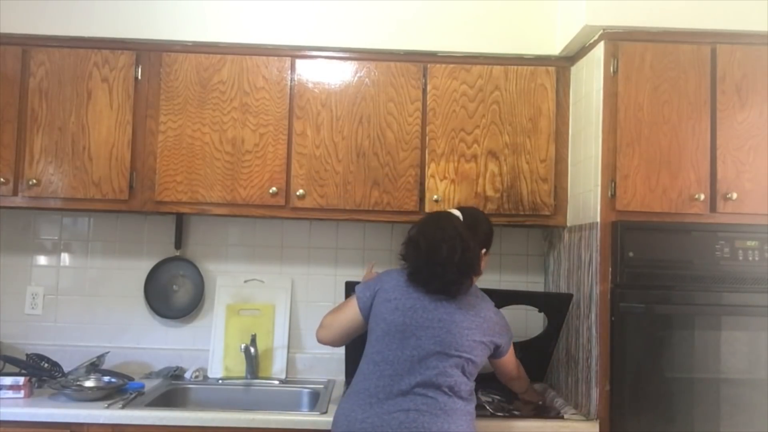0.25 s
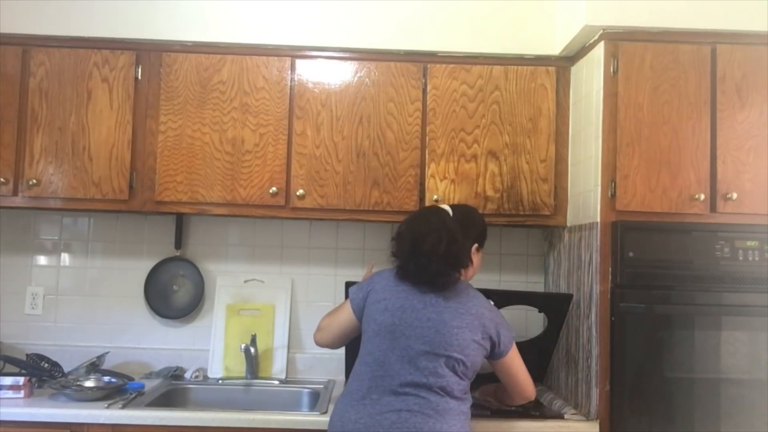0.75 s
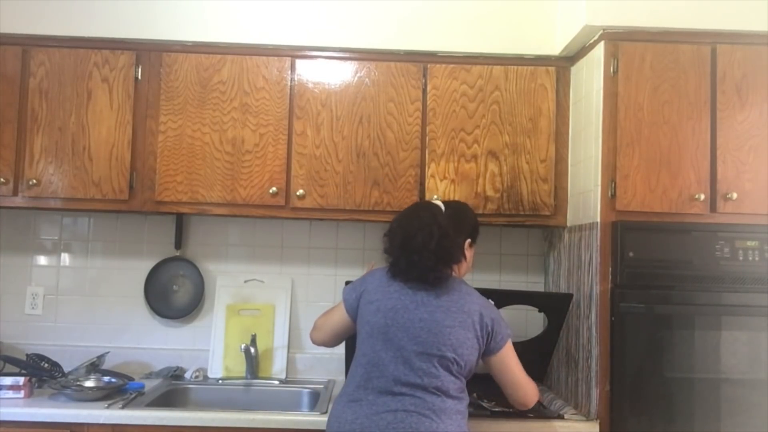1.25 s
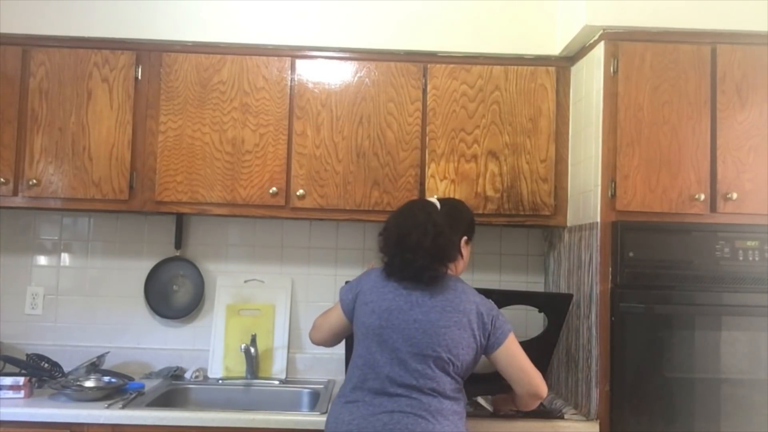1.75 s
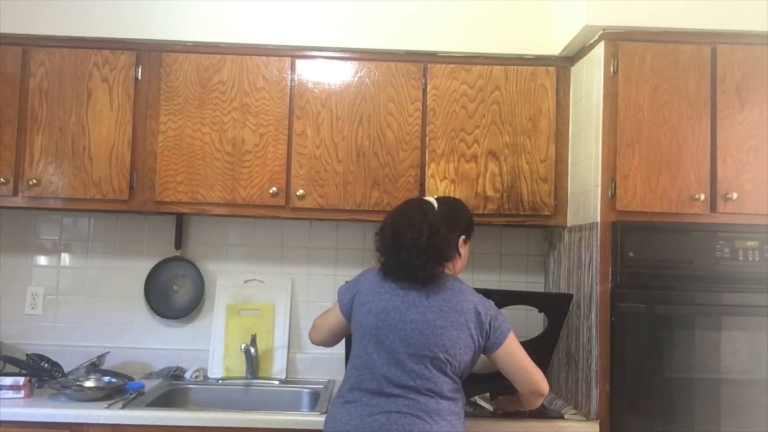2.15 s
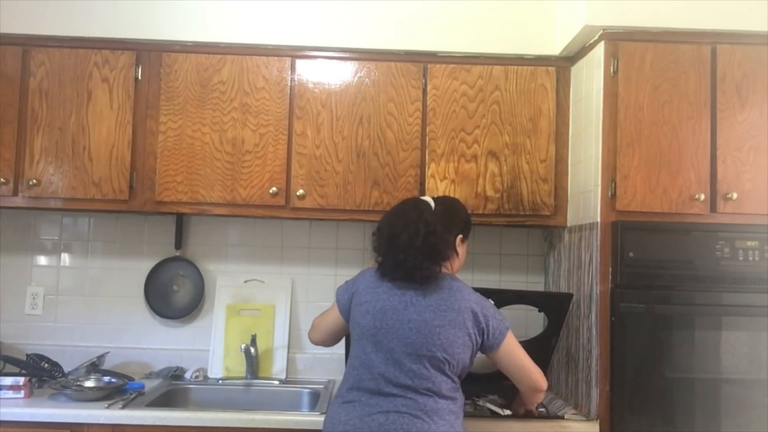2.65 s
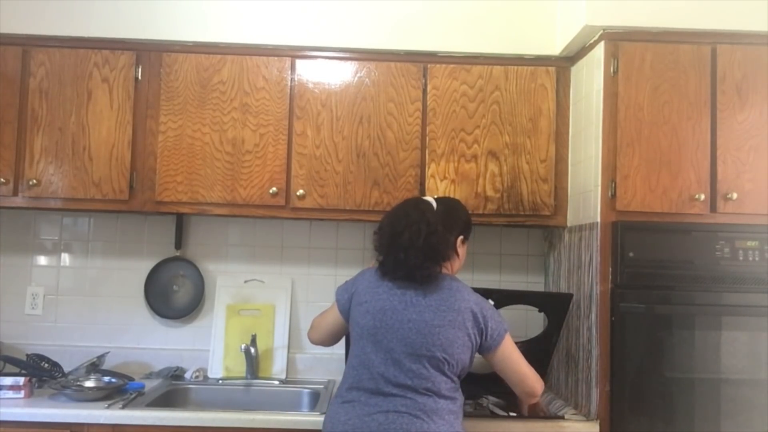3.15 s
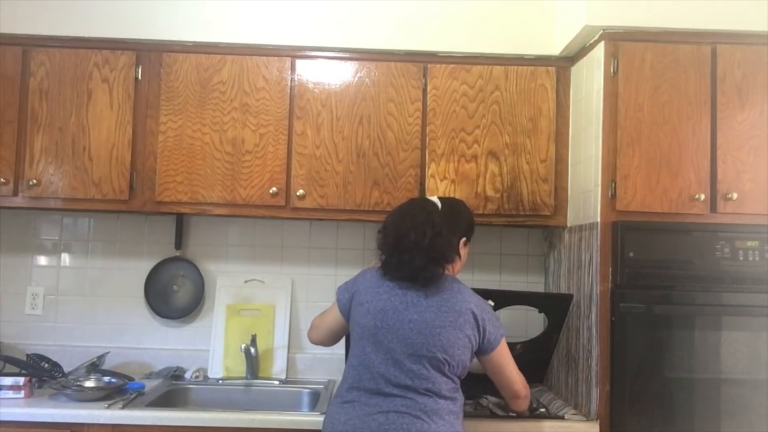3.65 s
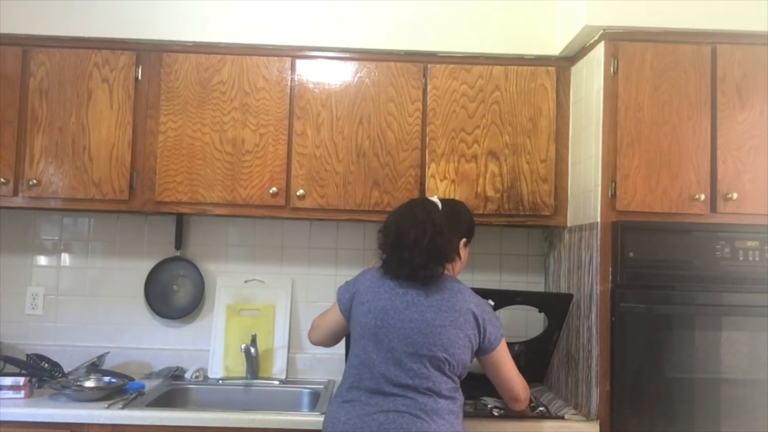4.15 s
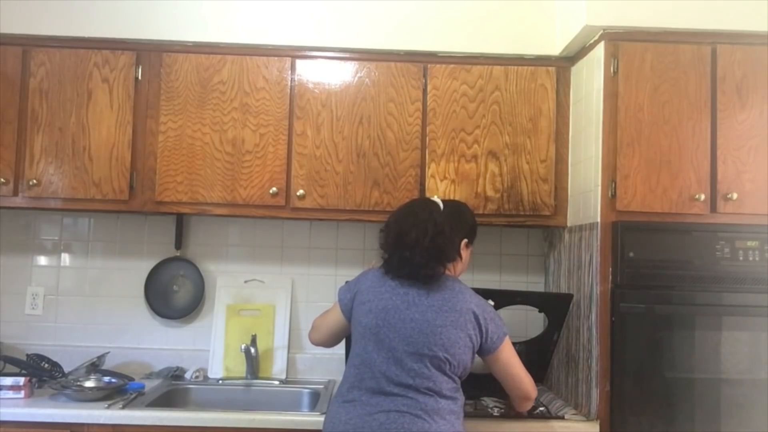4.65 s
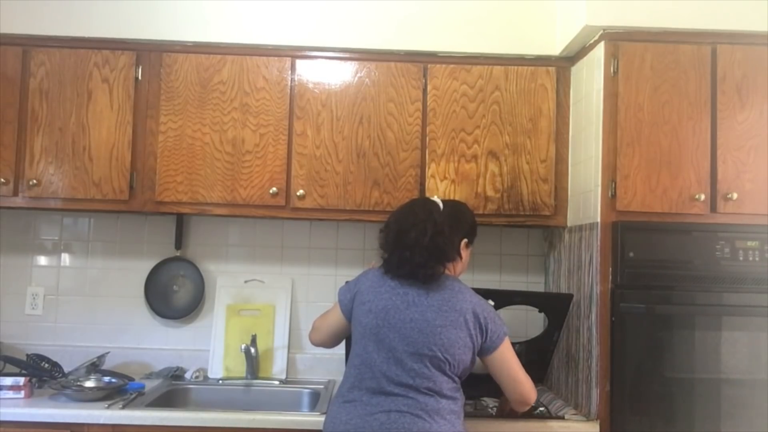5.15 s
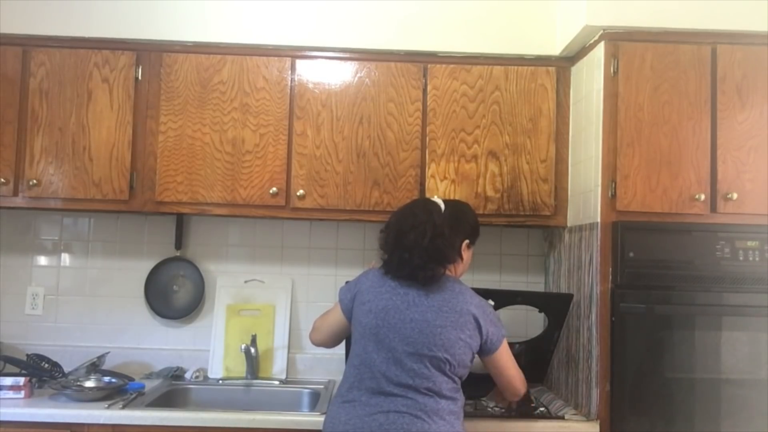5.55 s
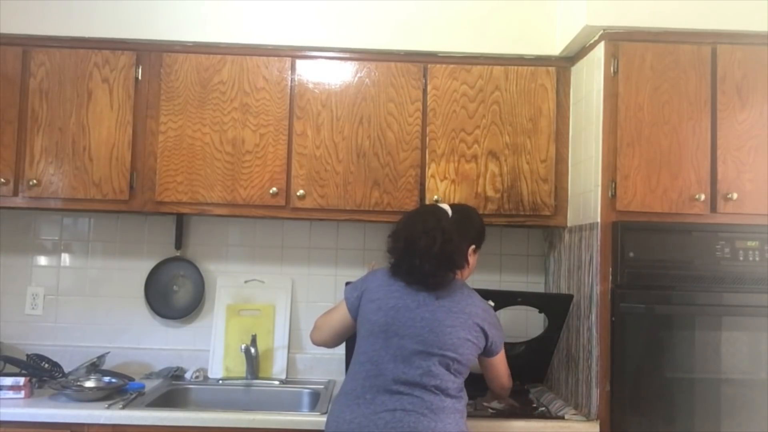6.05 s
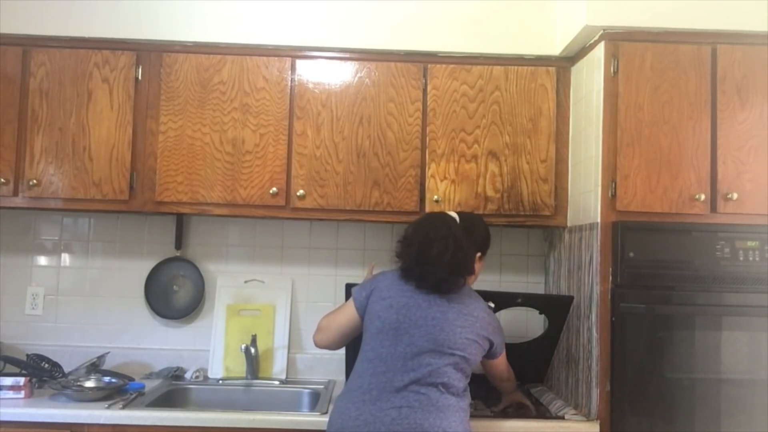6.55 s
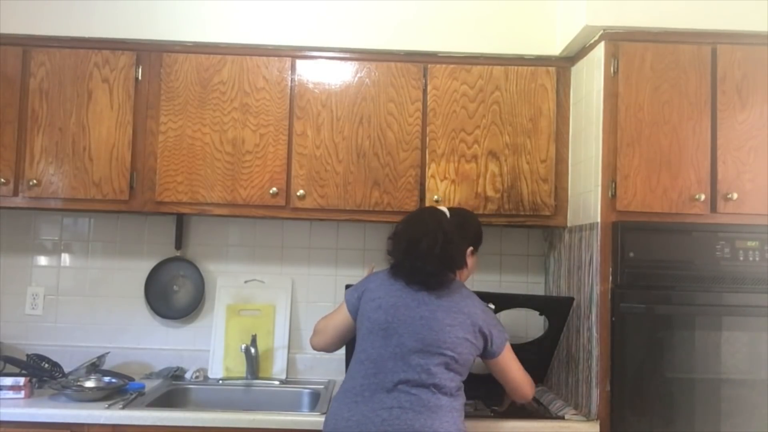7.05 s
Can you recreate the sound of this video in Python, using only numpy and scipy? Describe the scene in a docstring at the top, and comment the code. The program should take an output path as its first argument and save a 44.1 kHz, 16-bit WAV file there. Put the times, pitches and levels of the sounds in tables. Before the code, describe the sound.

Aluminium foil crinkles and snaps in irregular bursts as a hand presses it into a stove, with a few dull metal thuds.

```python
"""Aluminium foil is pressed and smoothed into an open stove, heard in mono across a kitchen.
It opens on light crinkles over a faint hiss: creases buckle in swarms of tiny clicks, single folds snap
and ring, and the room smears them. From 2.5 s the presses come loud and close together, then ease off
near 4.8 s. Between 5.2 and 6.5 s the hand lands its heaviest thuds on the stove's sheet metal, under
more crunches. A few soft presses tail off just after 7 s."""
import sys
import numpy as np
from scipy import signal
from scipy.fft import rfft, irfft
from scipy.io import wavfile
from scipy.ndimage import uniform_filter1d

SR = 44100
rng = np.random.default_rng(int(sys.argv[2]) if len(sys.argv) > 2 else 0)


def log_audio(samples):
    """Write samples as a 16-bit WAV file to the path given in sys.argv[1]."""
    # one column per channel
    frames = np.atleast_2d(samples).T
    # limit to full scale, then quantise
    limited = np.clip(frames, -1, 1)
    pcm = np.round(limited * 32767).astype(np.int16)
    wavfile.write(sys.argv[1], SR, pcm)


N = 321818

# each press of the hand on the foil:
# (start [s], attack [s], length [s], level [dB], fade [dB/s], brightness [dB], low body [dB])
HAND_PRESSES = [(0, 0.00073, .03, -42.5, 146, 0.5, -19), (0.027, 0.015, .06, -43.5, 249, 2, -19),
                (0.081, 0.062, 0.14, -46.5, 108, 2, -26), (0.208, 0.036, 0.35, -56.5, 26.5, -3, -21),
                (.56, 0.025, .08, -60.5, 5, -6, -30), (0.612, 0.047, 0.14, -52, 190, -5, -26),
                (0.685, 0.088, 0.22, -57, 2, -5, -20.5), (0.84, 0.049, 0.12, -48.5, 17, 3, -16),
                (0.922, .016, 0.036, -43.5, 403, -6, -19), (0.948, 0.0088, .1, -57, 70, -1.5, -11),
                (1.04, 0.026, 0.23, -60, 53, -3, -20), (1.497, .06, 0.12, -58, -3, 2, -19),
                (1.719, .1, .36, -39, 51.5, -1, -14.5), (2.08, 0.016, 0.075, -41, 312, -1, -34),
                (2.152, 0.028, 0.091, -46.5, 400, -28, -19), (2.248, 0.049, .06, -52, 340, -3.5, -10),
                (2.304, 0.047, .06, -48.5, 115, -2, -19), (2.369, 0.019, .11, -51, 154, -4, -17),
                (2.475, 0.1, 0.26, -40, 182, 1, -30), (2.589, 0.17, 0.25, -32.5, 80, -2.5, -19.5),
                (2.832, 0.029, 0.1, -35.5, 121, 0, -17.5), (2.91, .054, 0.2, -38.5, 201, -6, -25),
                (3.046, 0.056, 0.15, -41, 177, -4, -25), (3.162, 0.021, .05, -53, 103, -1.5, -19),
                (3.243, 0.015, 0.1, -43, 175, -6, -21), (3.355, 0.011, 0.078, -53.5, 382, -9, -12),
                (3.4, .05, .2, -73.5, 2, -2.5, -16), (3.672, 0.07, 0.064, -34.5, 7, -2, -18.5),
                (3.737, 0.03, 0.19, -28.5, 97, -2, -15.5), (3.94, 0.028, 0.093, -35.5, 8, -5, -24),
                (3.959, 0.099, 0.2, -32, 163, 0, -18), (4.157, 0.041, 0.17, -33.5, 305, -5, -16),
                (4.412, 0.027, 0.059, -34, 308, -17, -14.5), (4.428, 0.095, 0.24, -28, 139, -2.5, -20.5),
                (4.554, .08, 0.23, -27.5, 393, -2.5, -15.5), (4.702, 0.072, 0.16, -67, 5, -1, -5),
                (4.85, 0.023, .085, -56, 135, -13, -17), (4.932, .01, 0.16, -63.5, 28, -10, -12),
                (5.249, 0.041, 0.068, -29.5, 186, -4, -5), (5.323, 0.032, 0.076, -40, 10, -1.5, -15),
                (5.414, 0.014, .1, -31.5, 301, -2.5, -27.5), (5.459, 0.024, .14, -54, 111, 4, -13),
                (5.74, 0.017, .03, -47, 10, -13, -22), (5.754, 0.023, 0.17, -27, 10, 0, -22),
                (5.871, 0.057, .09, -26.5, 277, -16, -10), (5.941, 0.032, .22, -37, 82, -2.5, -14),
                (6.288, 0.024, 0.09, -43.5, 16, 2, -23), (6.377, 0.016, .06, -35, 31, -1.5, -23),
                (6.423, 0.03, 0.11, -31, 186, 3, -13), (6.5, 0.058, .17, -51, 84, 4, -10.5),
                (6.663, 0.035, 0.12, -44.5, 17, 3.5, -14.5), (6.793, 0.043, 0.073, -50, 143, 3.5, -12),
                (6.886, 0.017, 0.043, -51.5, 148, 5.5, -15), (6.946, 0.013, 0.046, -54.5, 150, 2.5, -6),
                (6.991, 0.025, 0.02, -54, 198, -15, 5)]
# tone colour of crinkling foil: (frequency [Hz], relative level per Hz [dB])
FOIL_SPECTRUM = [(120, -72), (200, -45), (267, -13.5), (395, -8), (542, -10), (779, -2), (1560, 4),
                 (2490, -1.5), (3750, 3), (4560, -2.5), (6270, -7.5), (6970, -6.5), (7400, -80),
                 (9620, -49), (16300, -120)]
# single folds that snap: (time [s], level [dB], ring pitch [Hz], ring trim [dB], nominal t60 [s])
FOLD_SNAPS = [(0.012, -42.5, 1724, 4, 0.13), (0.092, -37, 1148, -2, 0.17), (0.193, -35, 3590, 2.5, 0.034),
              (0.571, -50, 2300, 6, 0.048), (0.647, -51, 1307, 11.5, 0.1), (0.851, -45, 1800, 7, 0.17),
              (0.87, -32, 1300, 0.5, 0.12), (0.93, -31, 1270, -2, 0.051), (1.064, -42, 2310, -8, 0.083),
              (1.507, -52, 1100, -3, 0.11), (1.548, -42.5, 1116, -8, 0.056), (1.737, -38.5, 3970, -3, 0.21),
              (2.088, -40.5, 3470, 1, 0.11), (2.092, -59.5, 612, 6.5, 0.47), (2.171, -50, 1578, 9.5, 0.1),
              (2.174, -42, 800, 12.5, 0.047), (2.43, -62.5, 648, 11, 0.3), (2.279, -47.5, 1604, 8.5, 0.12),
              (2.285, -56.5, 473, 3.5, 0.24), (2.338, -50, 1470, 9, 0.071), (2.493, -49, 3200, 8, 0.1),
              (2.527, -30.5, 823, -11.5, 0.2), (2.568, -21.5, 1333, 0.5, 0.048),
              (2.65, -23, 1985, -5, 0.037), (2.749, -25, 2170, 3.5, 0.04), (2.856, -19.5, 1828, -9.5, 0.15),
              (3.088, -27.5, 853, -2.5, 0.087), (3.212, -42, 1340, 5, 0.13),
              (3.255, -37.5, 1490, 10, 0.056), (3.259, -42, 629, 10.5, 0.048),
              (3.363, -39.5, 1515, 1.5, 0.047), (3.463, -59, 1636, 9, 0.063), (3.679, -43, 1870, 8, 0.1),
              (3.702, -21.5, 1795, -1, 0.083), (3.763, -13.5, 1150, 2.5, 0.016),
              (3.912, -30.5, 3450, -6, 0.095), (3.954, -36, 914, -1, 0.088), (4.046, -12, 2860, -6, 0.039),
              (4.159, -34.5, 1479, 2.5, 0.26), (4.404, -42.5, 1550, -2, 0.12),
              (4.433, -23.5, 1866, 2, 0.072), (4.456, -20.5, 1718, -5, 0.064), (4.58, -25, 2280, 6, 0.075),
              (4.782, -49.5, 1780, 9.5, 0.019), (4.82, -47, 1530, -10, 0.076),
              (4.868, -46.5, 3440, 1, 0.063), (5.262, -25, 1694, -1.5, 0.18), (5.274, -16, 1510, -18, 0.13),
              (5.426, -19.5, 3890, 2, 0.019), (5.751, -38, 1826, 9, 0.1), (5.76, -28, 1792, 6.5, 0.34),
              (6.299, -38.5, 988, 0.5, 0.19), (6.322, -27, 1950, -9, 0.16), (6.388, -36, 954, 4, 0.21),
              (6.437, -17.5, 928, -6.5, 0.08), (6.695, -29, 990, -18, 0.091),
              (6.795, -49.5, 470, 8.5, 0.082), (6.823, -37, 1070, -16, 0.12), (6.901, -38, 1830, -13, 0.11),
              (6.964, -34.5, 937, -11, 0.13), (7.005, -44.5, 470, 7.5, 0.079)]
# the hand hits the stove: (time [s], level [dB], hardness as upper-mode gain [dB], time until muted [s])
HAND_THUDS = [(1.735, -74, 12, .1), (2.654, -72.5, 13.5, .04), (2.723, -62.5, 2, .06),
              (2.857, -67, 10, .05), (3.1, -82, -8, .05), (3.714, -73.5, 9, .05), (3.806, -53.5, -13, .12),
              (4.084, -76, 6, .06), (4.185, -73, 14, .05), (4.425, -63, 15, 0.072),
              (4.646, -58, 0.5, 0.087), (5.27, -41, -3.5, .08), (5.33, -46.5, -3.5, 0.093),
              (5.81, -55.5, 1, .05), (5.869, -42.5, -5.5, .07), (5.949, -50.5, -3, .05),
              (6.434, -49, -5, .06), (6.511, -62, 7.5, .06), (6.734, -64, 5, .06), (7.0, -69, 7, 0.046)]
# modes of the stove's sheet metal: (frequency [Hz], level [dB], t60 [s])
STOVE_MODES = [(118.5, 3, 0.2), (190, -4.5, 0.21), (283, -1, 0.48), (420, -6.5, 0.12), (479, 8.5, 0.2),
               (663, -4, 0.2), (850, 0.5, 0.39), (926, -6.5, 0.96)]
# the kitchen's reverb tail: (frequency [Hz], t60 [s])
KITCHEN_DECAY = [(200, 0.16), (1000, 0.18), (3000, 0.28), (7000, 0.17)]
# tone colour of the hiss bed: (frequency [Hz], relative level per Hz [dB])
HISS_SPECTRUM = [(18, -64), (30, -31), (122, -10.5), (177, -15), (268, -8), (586, -6.5), (1090, -0.5),
                 (1860, -4), (2180, -9), (3300, -13), (3540, -15.5), (6300, -17.5), (7400, -29.5),
                 (9620, -65.5), (16300, -120)]
# the hiss creeps up and down: (time [s], level [dB])
HISS_LEVELS = [(0, -79), (1.4, -74.5), (1.7, -76), (3.599, -69.5), (4.37, -69.5), (5.2, -67), (5.699, -70),
               (6.26, -69.5), (7.3, -67.5)]


def foil_crackle(per_s=900, spread_db=1.0, ring_cycles=6.6, patchy_db=3.0, patch_s=0.041, puff_db=-45):
    """Facets of every size buckle at random; a small facet clicks high, a large one low."""
    groups = np.zeros((4, N))  # large, middle, small and tiny facets
    for hz in np.geomspace(230, 7200, num=44):
        strength = gain_of(spread_db * np.minimum(rng.exponential(1, N), 4)) * rng.choice([-1, 1], N)
        buckles = rng.random(N) < per_s * np.sqrt(hz / 2000) / SR  # per_s at 2 kHz, denser above
        patches = gain_of(patchy_db * np.minimum(wander(patch_s), 2))
        cycles = np.arange(round(5 * ring_cycles * SR / hz)) * hz / SR
        click = np.sin(2 * np.pi * cycles) * (1 - np.exp(-cycles)) * np.exp(-cycles / ring_cycles)
        clicks = unit_rms(signal.oaconvolve(strength * buckles * patches, click)[:N])
        share = gain_of(curve_at(FOIL_SPECTRUM, hz)) * np.sqrt(hz)  # a band as wide as its pitch
        groups[np.searchsorted([700, 2800, 4700], hz)] += share * clicks
    envelopes = hand_pressure()
    swarm = sum(envelope * unit_rms(group) for envelope, group in zip(envelopes, groups))
    puff = coloured_noise([(20, -1), (150, 17.0), (300, -24), (600, -60.5)], N)  # the sheet shoves air
    return (swarm + gain_of(puff_db) * envelopes[1] * puff) * flurries()


def hand_pressure(release_db_per_s=403.5):
    """Envelopes for the large, middle, small and tiny facets: each press swells, fades and is let go."""
    power = np.zeros((4, N))
    for start, attack, length, db, fade, bright_db, body_db in HAND_PRESSES:
        t = np.arange(0, length + .2, 1 / SR)
        attack = max(attack, .001)
        fall_db = fade * np.maximum(t - attack, 0) + release_db_per_s * np.maximum(t - length, 0)
        push = np.minimum(t / attack, 1) * gain_of(db - fall_db)
        top_db = -5 + 1.21 * bright_db - 0.076 * fall_db  # tiny facets brighten more and fade faster
        for row, group_db in zip(power, (body_db, 0, bright_db, top_db)):
            place(row, start, (gain_of(group_db) * push) ** 2)
    return np.sqrt(power)


def flurries(per_s=110, spread_db=4.5, t60=0.016):
    """One facet sets off its neighbours: sudden flurries that die away, as a gain of rms 1."""
    kicks = gain_of(spread_db * np.minimum(rng.exponential(1, N), 3)) * (rng.random(N) < per_s / SR)
    decay = 10 ** (-3 / (t60 * SR))
    return unit_rms(1 + 0.19 * signal.lfilter([1], [1, -decay], kicks))


def fold_snaps(rattle_share=0.77, crack_t60=0.011, neighbour_hz=(817, 1109), low_cut_hz=320):
    """A fold gives way: a sharp crack, a noisy rattle, and its facet and a neighbour ringing on."""
    out, t = np.zeros(N), np.arange(8192) / SR
    crack = gain_of(-60 * t / crack_t60) * np.minimum(t / 0.00036, 1)
    attack = np.minimum(t / 0.0015, 1)
    for start, db, hz, ring_db, t60 in FOLD_SNAPS:
        rattle = gain_of(-60 * t / max(rattle_share * t60, .01))
        crack_db = 4 - 64 * t60  # a fold that rings long cracks less
        ring = facet_ring(hz, ring_db, t60, t)
        neighbour = facet_ring(rng.uniform(*neighbour_hz), db=-16.5, t60=t60, t=t)
        burst = 0.2 * coloured_noise(FOIL_SPECTRUM, len(t)) * (rattle + gain_of(crack_db) * crack)
        place(out, start, gain_of(db) * (burst + ring + neighbour) * attack)
    low_cut = signal.butter(2, low_cut_hz, "high", fs=SR, output="sos")  # too small to radiate bass
    return signal.sosfilt(low_cut, out)


def facet_ring(hz, db, t60, t, width_share=0.13, steady=0.6):
    """A dented facet is shaken by the rattle around it, so its tone wobbles; higher ones die sooner."""
    pole = np.exp(-np.pi * width_share * hz / SR)
    shaking = rng.standard_normal(2 * len(t)) + 1j * rng.standard_normal(2 * len(t))
    wobble = signal.lfilter([1], [1, -pole], signal.lfilter([1], [1, -pole], shaking))[len(t):]
    tone = (steady + wobble / abs(wobble).mean()) * np.exp(2j * np.pi * hz * t)
    ring_t60 = max(t60, .01) * (1500 / hz) ** 0.06
    return 0.25 * tone.imag * gain_of(db - 60 * t / ring_t60)


def hand_thuds(attack_s=0.0094, mute_s=0.011):
    """The palm mostly booms the stove's deepest panel, the knuckles all; then the hand mutes them."""
    out, t = np.zeros(N), np.arange(SR // 2) / SR
    attack = (1 - np.exp(-t / attack_s)) ** 2
    for start, db, hard_db, held_s in HAND_THUDS:
        mute = 1 / (1 + np.exp((t - held_s) / mute_s))
        place(out, start, gain_of(db) * stove_panels(t, hard_db, sag=0.161) * attack * mute)
    return out


def stove_panels(t, upper_db, sag=0.0):
    """Sheet metal rings after a blow; a panel under load starts flat and springs back to pitch."""
    bent_t = t - sag * 0.0273 * (1 - np.exp(-t / 0.037))
    return sum(gain_of(db + upper_db * (k > 0) - 60 * t / t60) * np.sin(2 * np.pi * hz * bent_t)
               for k, (hz, db, t60) in enumerate(STOVE_MODES))


def stove_resonance(foil, damping_db_per_s=60):
    """The foil shakes the panels under it for a metallic colour; foil and hands damp them."""
    t = np.arange(SR // 4) / SR
    metal = stove_panels(t, upper_db=2.5) * gain_of(-damping_db_per_s * t)
    return signal.fftconvolve(foil, metal / np.linalg.norm(metal))[:N]


def kitchen_reverb(send, predelay_samples=200, gap_samples=20):
    """The walls return sparse reflections of random sign, each band dying at its own speed."""
    taps = np.zeros(SR // 2)
    slots = np.arange(predelay_samples, len(taps) - gap_samples, gap_samples)
    taps[slots + rng.integers(0, gap_samples, len(slots))] = rng.choice([-1., 1.], len(slots))
    hz, t, bands = signal.stft(taps, SR, nperseg=256)
    decay = gain_of(-60 * t / curve_at(KITCHEN_DECAY, hz)[:, None])
    tail = signal.istft(bands * decay, SR, nperseg=256)[1]
    return signal.fftconvolve(send, tail / np.linalg.norm(tail))[:N]


def hiss_bed(flutter_db=0.3):
    """Air and electronics: soft noise that flutters a little."""
    times, levels = np.transpose(HISS_LEVELS)
    level_db = np.interp(np.arange(N) / SR, times, levels)
    return coloured_noise(HISS_SPECTRUM, N) * gain_of(level_db + flutter_db * wander(0.044))


def gain_of(db):
    """dB to gain."""
    return 10 ** (np.asarray(db) / 20)


def unit_rms(x):
    """Scales to rms 1."""
    return x / np.sqrt(np.mean(x ** 2) + 1e-20)


def curve_at(points, hz):
    """Reads a curve on a log-frequency axis."""
    knots_hz, values = np.transpose(points)
    return np.interp(np.log(hz + 1), np.log(knots_hz + 1), values)


def place(track, start_s, sound):
    """Mixes a sound into a track at its cue."""
    part = track[round(start_s * SR):][:len(sound)]
    part += sound[:len(part)]


def coloured_noise(spectrum, size):
    """Noise through an EQ curve, rms 1."""
    white = rfft(rng.standard_normal(size))
    eq = gain_of(curve_at(spectrum, np.fft.rfftfreq(size, 1 / SR)))
    return unit_rms(irfft(white * eq, size))


def wander(seconds, hop=128):
    """Smooth random modulation, rms about 1."""
    steps = rng.standard_normal(N // hop + 2)
    slow = uniform_filter1d(steps, max(round(seconds * SR / hop), 1))
    return np.interp(np.arange(N) / hop, np.arange(len(steps)), unit_rms(uniform_filter1d(slow, 3)))


def scene():
    """Foil direct, through the stove and off the walls, with thuds and hiss; both channels alike."""
    crackle, snaps = foil_crackle(), fold_snaps()
    foil = gain_of(-4.5) * crackle + gain_of(2) * snaps
    stove = gain_of(-26.5) * stove_resonance(foil)
    walls = kitchen_reverb(gain_of(-20) * crackle + gain_of(0.5) * snaps)
    return np.tile(foil + stove + walls + hand_thuds() + hiss_bed(), (2, 1))


def record(dry, high_cut_hz=7300):
    """A narrow-band microphone channel shaves off the top end."""
    high_cut = signal.firwin(201, high_cut_hz, window=("kaiser", 9), fs=SR)
    return signal.oaconvolve(dry, high_cut[None], "same")


dry = scene()
out = record(dry)
log_audio(out)
```